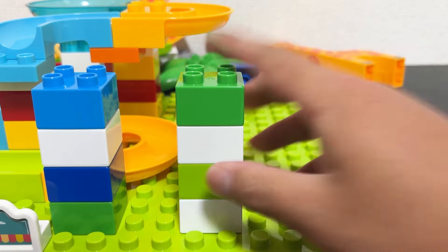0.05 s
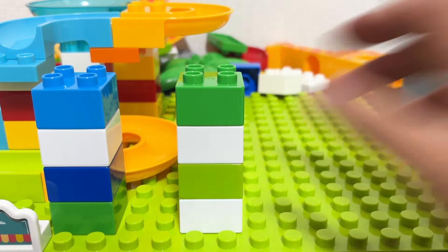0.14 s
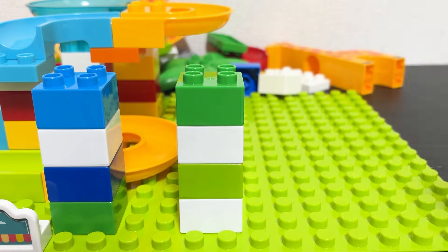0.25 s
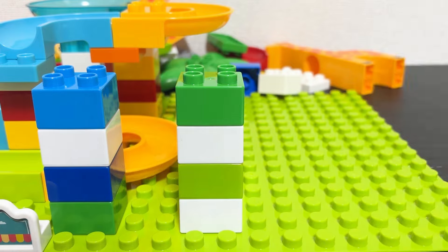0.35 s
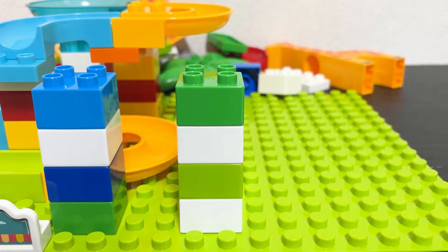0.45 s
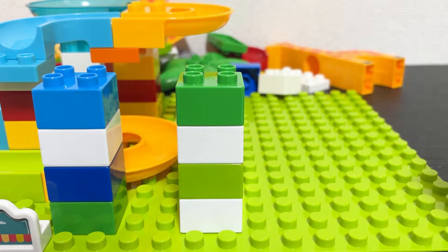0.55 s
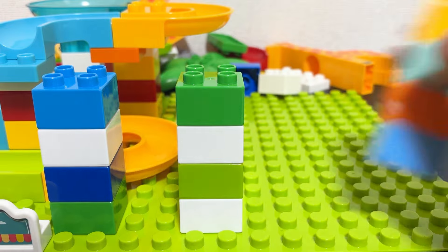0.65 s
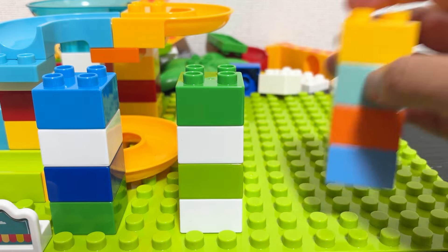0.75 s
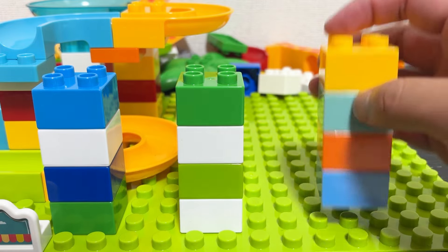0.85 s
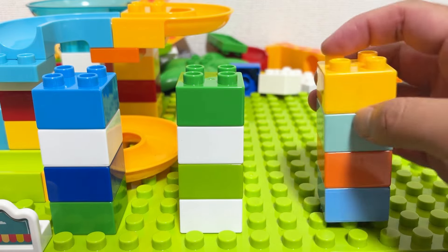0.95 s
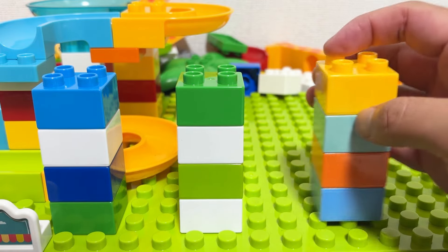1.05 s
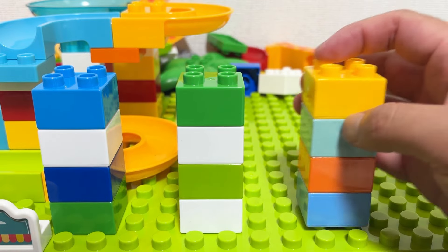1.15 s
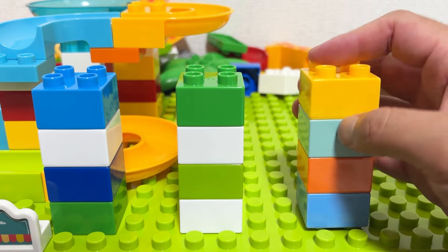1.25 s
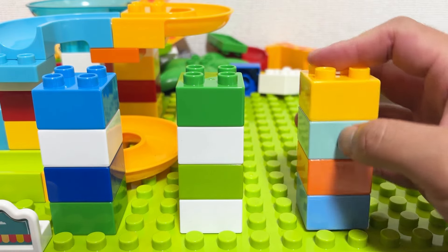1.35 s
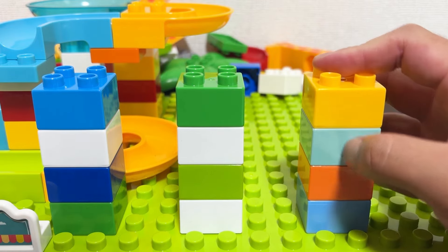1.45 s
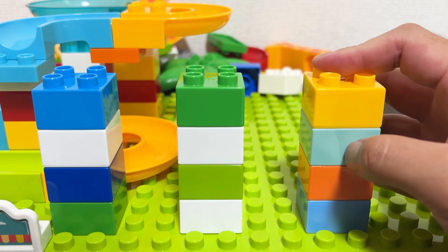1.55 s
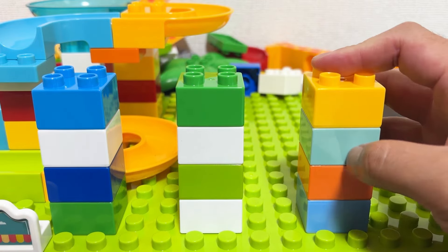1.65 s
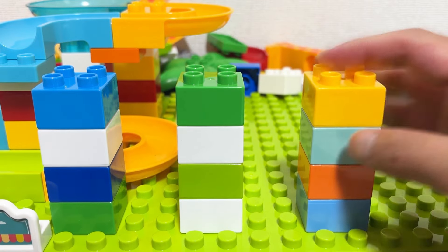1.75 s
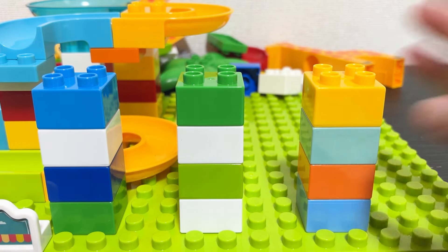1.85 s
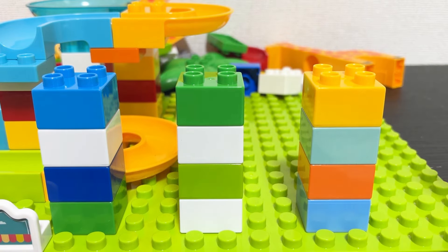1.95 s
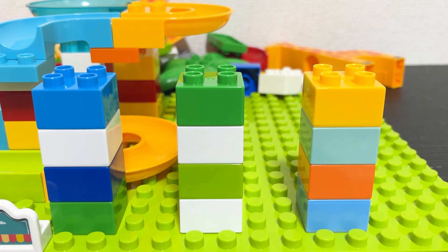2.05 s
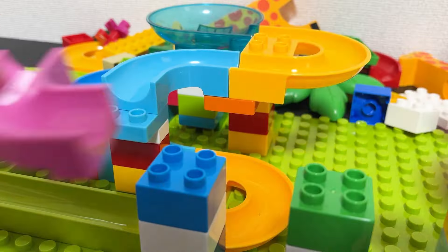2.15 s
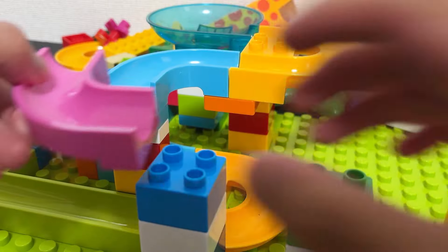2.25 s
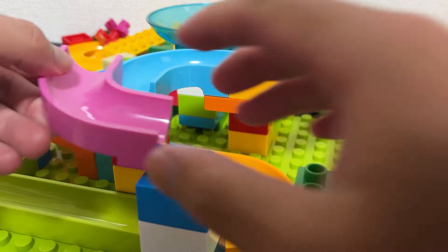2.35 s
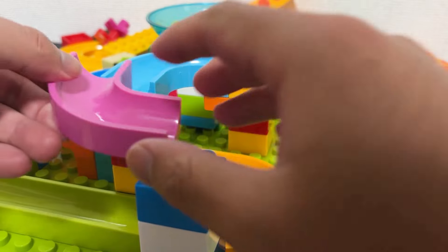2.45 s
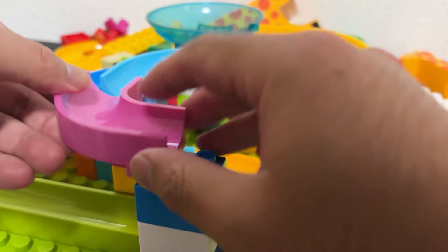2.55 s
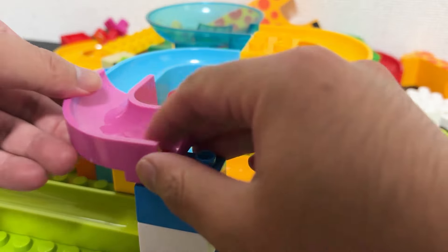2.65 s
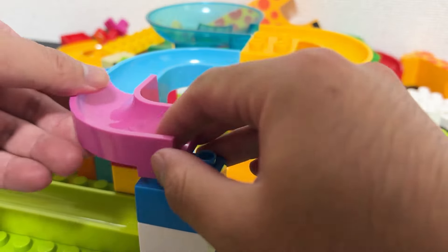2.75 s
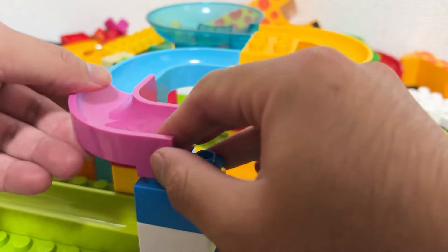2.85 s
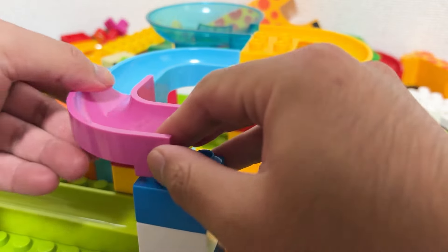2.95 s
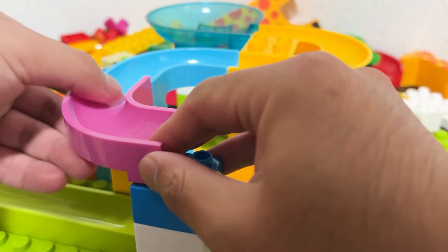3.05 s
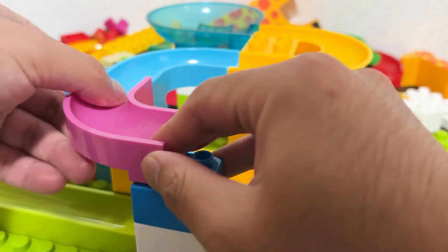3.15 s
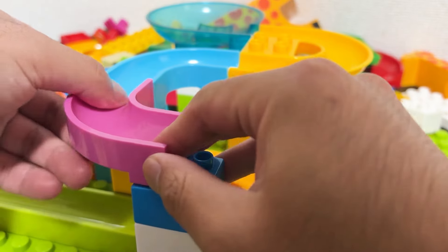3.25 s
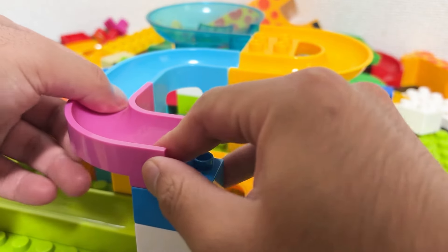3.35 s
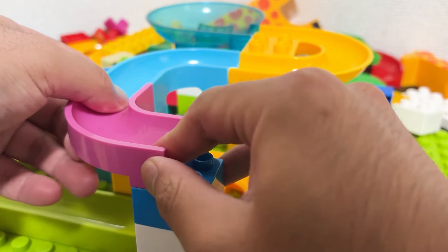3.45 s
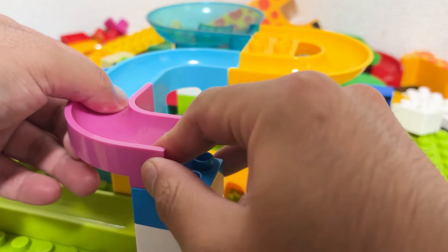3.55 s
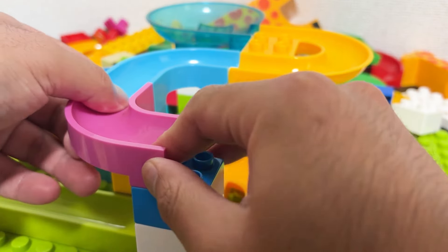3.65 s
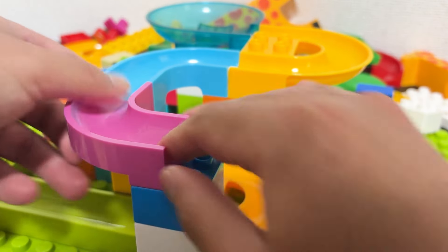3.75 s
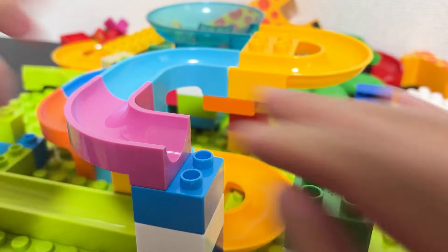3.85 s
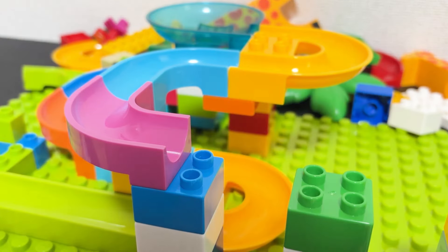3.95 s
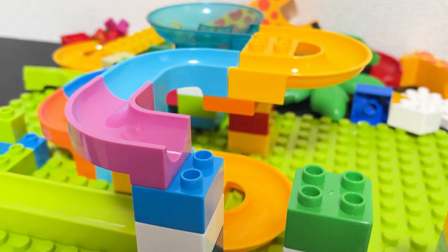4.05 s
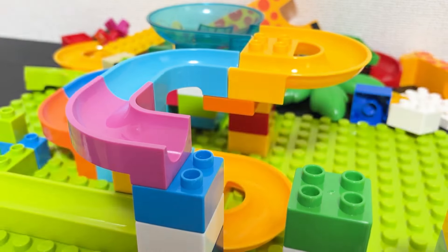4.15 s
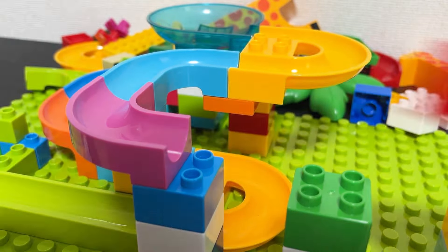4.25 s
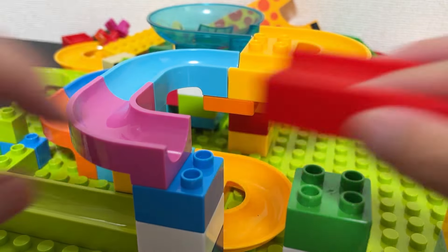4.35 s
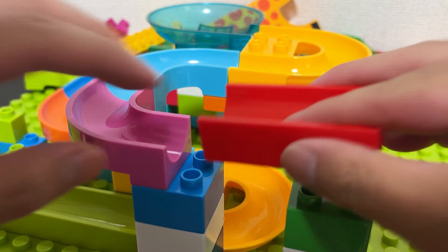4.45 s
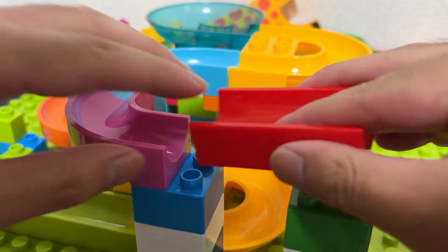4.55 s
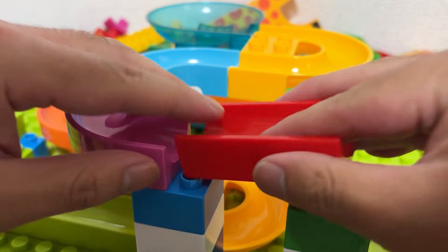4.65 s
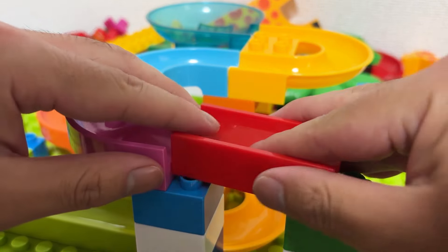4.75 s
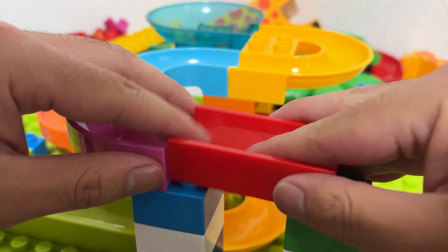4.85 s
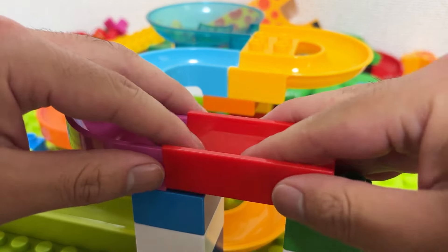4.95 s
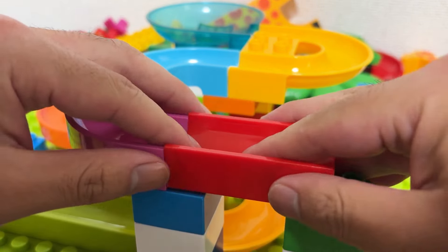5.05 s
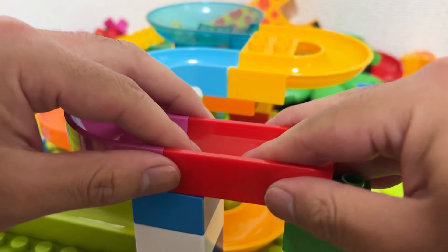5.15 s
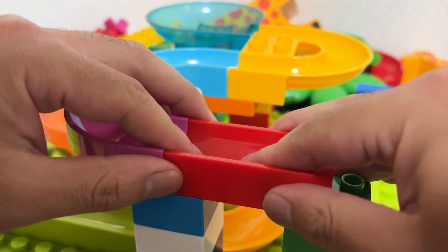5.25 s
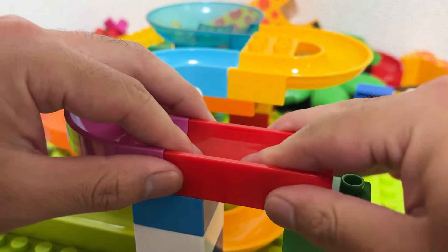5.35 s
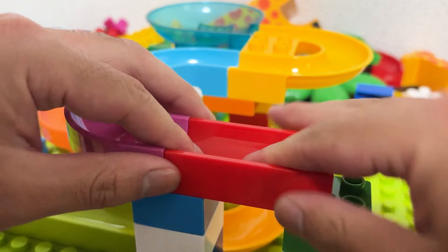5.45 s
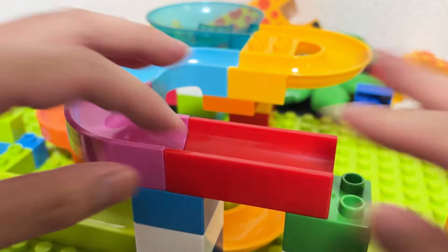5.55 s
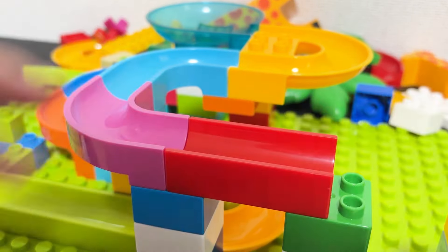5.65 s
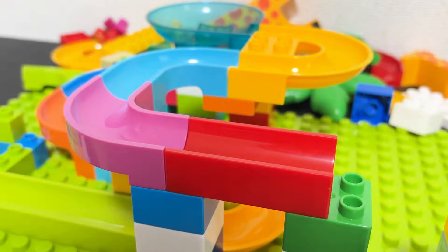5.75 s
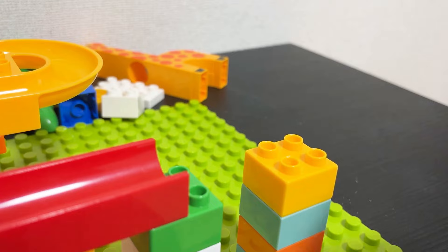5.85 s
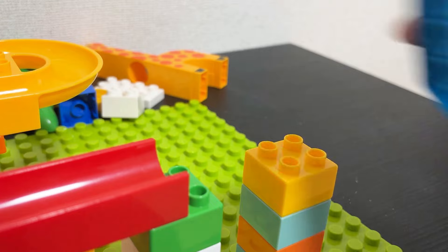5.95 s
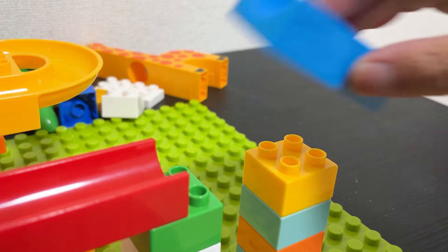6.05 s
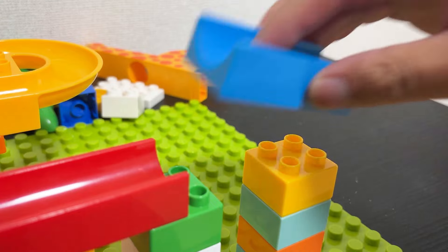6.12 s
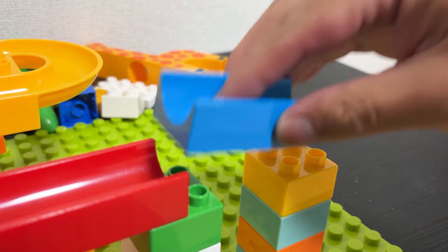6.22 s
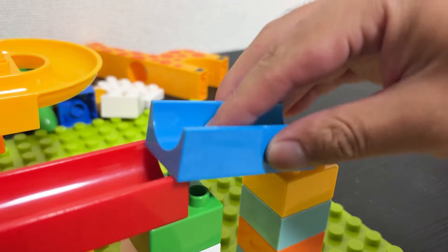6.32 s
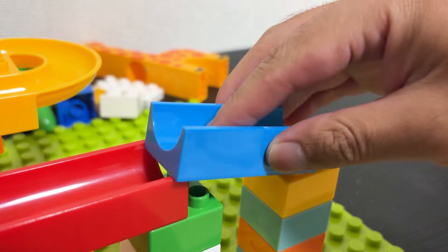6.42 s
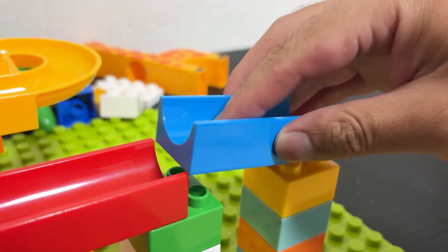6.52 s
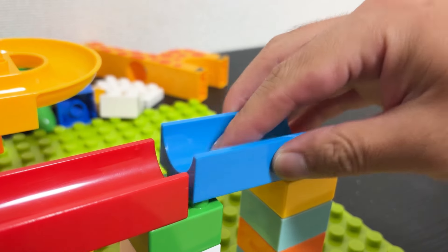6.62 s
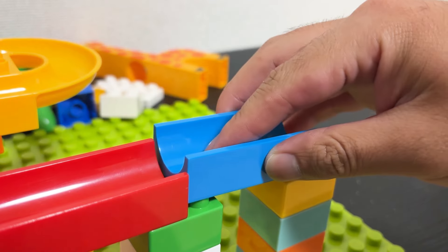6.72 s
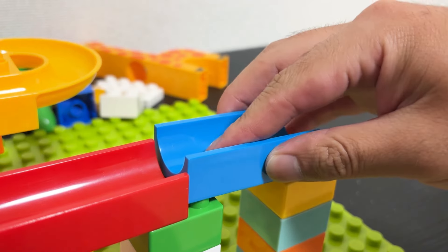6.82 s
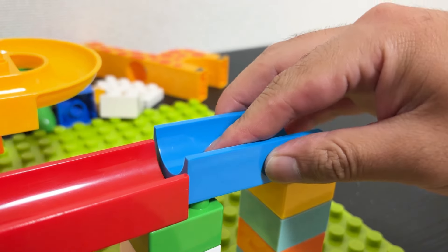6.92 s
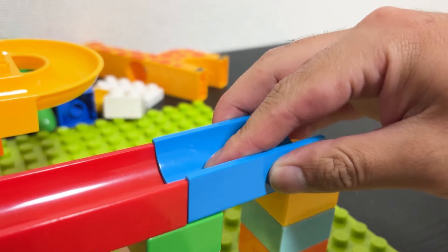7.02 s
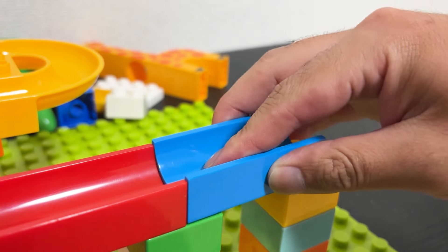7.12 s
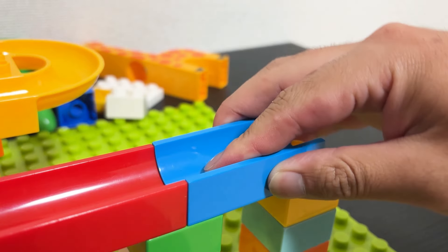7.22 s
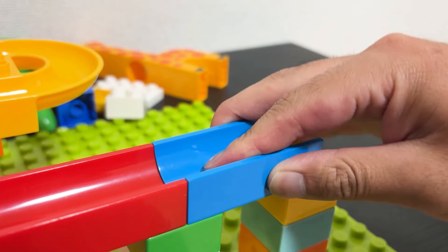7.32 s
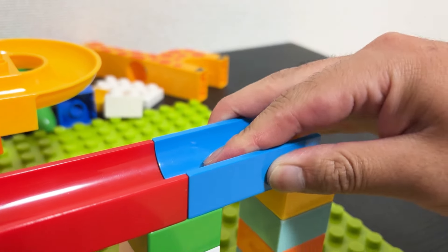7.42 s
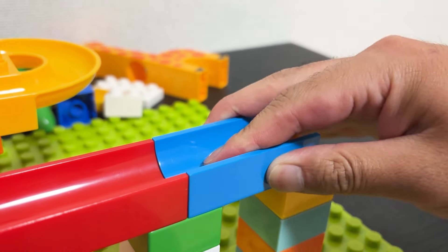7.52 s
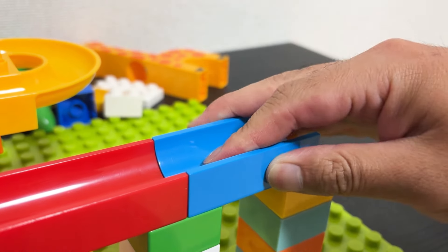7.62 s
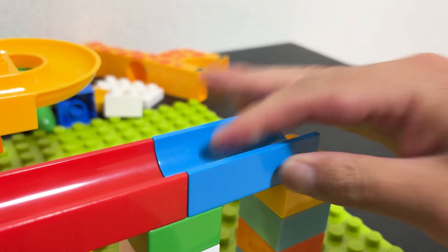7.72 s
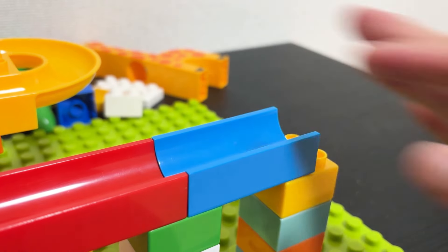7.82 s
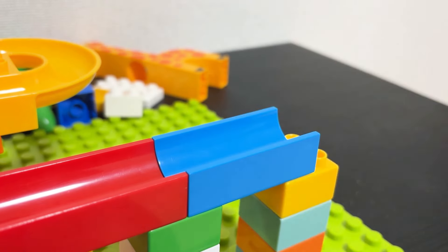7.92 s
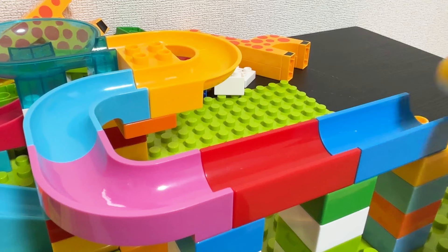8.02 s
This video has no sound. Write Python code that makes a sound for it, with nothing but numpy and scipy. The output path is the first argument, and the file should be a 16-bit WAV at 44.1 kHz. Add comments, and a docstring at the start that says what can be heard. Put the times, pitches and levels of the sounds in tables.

```python
"""Hollow plastic blocks and track pieces, fitted together by hand on a table, close to the microphone.
Each contact is a short flurry of ticks that rings the pieces and thumps the table top; in between,
fingers slide and pieces squeak in the grip. The place is a small quiet room that answers for about a
third of a second over a low household rumble. Heard in stereo through the two ports of a phone."""
import sys
import numpy as np
from scipy import signal
from scipy.fft import rfft, irfft
from scipy.io import wavfile
from scipy.ndimage import uniform_filter1d

SR = 44100
rng = np.random.default_rng(int(sys.argv[2]) if len(sys.argv) > 2 else 0)


def materialize(psi):
    """Save the field psi as 16-bit PCM at rate SR to the path in sys.argv[1].

    A 1-D psi becomes a single channel; in a 2-D psi each row is a channel.
    """
    bounded = np.clip(np.atleast_2d(psi).T, -1, 1)
    quanta = np.round(bounded * 32767).astype(np.int16)
    wavfile.write(sys.argv[1], SR, quanta)


N = 356328

# the level of the low background rumble wavers irregularly: time_s, relative_db
RUMBLE_WAVER = [(0, -67.5), (.25, -66.5), (.47, -74), (1.3, -70.5), (1.86, -68), (2.16, -80), (2.59, -76),
                (2.951, -66), (3.71, -73.5), (4.41, -73.5), (5.1, -65), (5.71, -72), (6.25, -65),
                (6.73, -63), (6.858, -80.5), (7.0, -64.5), (7.6, -70.5), (8.08, -76.5)]
# spectrum of the rumble: freq_hz, relative_db
RUMBLE_SPECTRUM = [(18, -28), (35, -3.5), (55, 3), (90, -8.5), (140, -24.5), (300, -59)]
# spectrum of the air hiss: freq_hz, relative_db
HISS_SPECTRUM = [(59, -29.5), (100, -3.5), (129, -2.5), (150, -10), (433, -18.5), (854, -25.5),
                 (1480, -32.5), (1760, -33), (2080, -33.5), (6560, -36.5), (16000, -51)]
# reverberation of the small room: freq_hz, t60_s, gain_db
ROOM_DECAY = [(60, 0.52, -6), (250, 0.45, -4.5), (1000, 0.28, -0.5), (3000, 0.2488, -3.5),
              (7000, 0.3, -13.5), (14040, 0.2, -14)]
# how alike the room sounds at the left and right ports: freq_hz, coherence
ROOM_COHERENCE = [(100, .9), (300, 0.84), (700, 0.052), (1500, 0.3), (3000, .5), (6000, 0.56), (9000, 1),
                  (15000, 0.59)]
# fingers sliding on plastic: start_s, loudest_s, end_s, level_db, dull_share_db
FINGER_SLIDES = [(0, 0.033, 0.0594, -65, -7), (0.528, 0.655, 0.793, -67.5, -18),
                 (.85, 0.853, 0.95, -76, -25), (1.02, 1.087, 1.128, -57.5, -8),
                 (1.2, 1.201, 1.41, -65.5, -10), (1.359, 1.468, 1.509, -68, -3),
                 (1.58, 1.612, 1.687, -70.5, -3), (1.738, 1.759, 1.805, -76, 5.5),
                 (2.165, 2.203, 2.346, -84, 1.5), (2.433, 2.476, 2.697, -76.5, 14),
                 (2.51, 2.643, 2.795, -65.5, 13), (2.795, 2.902, 3.205, -71, -5),
                 (3.027, 3.052, 3.21, -67.5, -9), (3.342, 3.38, 3.505, -69.5, -6),
                 (3.682, 3.767, 3.883, -64, -5), (3.861, 3.923, 4.164, -78.5, -7.5),
                 (4.231, 4.256, 4.36, -73, -17), (4.3, 4.582, 5.58, -75.5, -17.5),
                 (5.068, 5.156, 5.225, -69, 3), (5.431, 5.525, 5.57, -60, -12),
                 (5.862, 5.895, 5.994, -74.5, -14.5), (5.973, 6.02, 6.172, -66, -24),
                 (6.448, 6.457, 6.56, -68.5, -1.5), (7.19, 7.224, 7.313, -75, 19),
                 (7.26, 7.331, 7.4, -64, 13.5), (7.398, 7.461, 7.53, -69, 15.5),
                 (7.62, 7.704, 7.797, -68.5, -7)]
# bright bands of skin friction: centre_hz, width_hz, gain_db
SKIN_BANDS = [(2850, 1100, -2), (5600, 3100, -2.5), (8270, 7100, -0.5), (11960, 4300, -3)]
# low resonances of a rubbed piece: centre_hz, width_hz, gain_db
RUBBED_BANDS = [(654, 500, -0.5), (1157, 1000, -4.5), (2019, 150, -4)]
# a piece slips in the grip or onto the studs: start_s, loudest_s, end_s, level_db, pitch_hz
SLIP_SQUEAKS = [(0.532, .67, 0.715, -78.5, 2896), (0.857, 0.869, 0.897, -71.5, 2960),
                (1.037, 1.094, 1.112, -47, 3056)]
# modes of the table top: pitch_hz, gain_db, t60_s
TABLE_MODES = [(57, -17.5, 0.28), (74.11, -20, 0.65), (85.42, -13.5, 0.73), (126, -13, 0.09),
               (145.6, -16.5, 0.18), (201.66, -3.5, 0.1), (270.2, -12.5, 0.12), (380.4, -9.5, 0.066),
               (537.02, -4.5, 0.057)]
# the hand leans its weight on the table: start_s, push_db
HAND_PRESSES = [(0.942, -41.5), (1.144, -35), (1.315, -53.5), (3.002, -44), (4.747, -53), (5.006, -44),
                (5.093, -49), (5.183, -47.5), (6.293, -50), (6.53, -53), (6.698, -49.5), (6.972, -29.5),
                (7.065, -38.5), (7.23, -32), (7.304, -37.5), (7.364, -44)]
# modes of the hollow pieces: pitch_hz, gain_db, t60_ms
PLASTIC_MODES = [(722, 1, 5.3), (1211, 1, 12), (1453, -0.5, 15), (1924, -5.5, 5.9), (3010, -6.5, 6.6),
                 (3965, -4, 17), (4095, -5, 6.8), (4975, 1.5, 13), (6045, 2.5, 5.8), (6080, -3, 6.1),
                 (6670, -3, 8), (8960, -6.5, 3.6)]
# the piece in hand and its air space: from_s, hollow_hz, left_minus_right_db, tick_below_snap_db
HELD_PIECES = [(0, 2950, 1, 8), (1.125, 3805, 2, 3.5), (2.2, 2697, 3, 23), (2.5, 2142, 3, 8),
               (2.95, 2747, 3.5, 6.5), (4.4, 2923, 3, 9.5), (4.95, 2895, 2, 5.5), (6.1, 2717, 3.5, 10.5),
               (6.9, 3667, 1.48, 7), (7.2, 2626, 2.5, 5)]
# plastic meets plastic; body, hollow, snap and table knock are trims relative to the level:
# start_s, level_db, ring_hz, body_db, hollow_db, snap_db, knock_db, flurry_ms
CONTACTS = [(.246, -62.5, 4110, -36.5, -27.5, 0, -23.5, 4.3),
            (.548, -60.5, 5000, -31.5, -3, -1.5, -32, 4.4),
            (.943, -27, 608, -5.5, -16.5, -3.5, -16.5, 3.71),
            (1.085, -31, 1900, -13, -10, -18.5, -28.5, 8.9), (1.113, -27, 3240, -8, 2, -12.5, -14, 11),
            (1.118, -18.5, 2748, -19.5, -8.5, -15.5, -33, 8.7),
            (1.129, -18.5, 3900, -21.5, -13.5, -6.5, -36.5, 4.44),
            (1.144, -26, 3670, -33.5, -3.5, -18, -14, 3.3), (1.315, -48, 596, -13, -30.5, -26, -5, 2.7),
            (1.459, -57.5, 1000, -13, -25.5, -10, -4, 3.76),
            (1.601, -55, 659, -19.5, -15.5, -9.5, -10.5, 5.5),
            (1.757, -56.5, 1747, -25, -25, -11.5, -12, 4.5),
            (2.352, -19, 2726, -26.5, -24, -22, -32.5, 3.8), (2.447, -45, 1140, 1, -26.5, -42.5, -40, 5.3),
            (2.454, -37.5, 1119, -19, -20, -30.5, -17, 9.8), (2.477, -49.5, 1090, -12, 4, -23, -20.5, 2.8),
            (2.519, -30.5, 1977, -19.5, -4.5, -20.5, -38.5, 6.8),
            (2.558, -28.5, 2050, -13, -26, -14, -21.5, 8.4), (2.577, -36.5, 1004, -8, -15, -9, -18, 4.05),
            (2.589, -28, 2284, -18, -4, -11.5, -22.5, 1.6), (2.609, -38, 2800, -24, -10, -25.5, -12.5, 4.5),
            (2.645, -25, 3930, -27.5, -10.5, -31.5, -20.5, 6.95),
            (2.656, -38, 1100, -8, -20.5, -8, -18.5, 3.7), (2.668, -28, 736, -17, -31.5, -13.5, -14, 3.65),
            (2.701, -42.5, 670, -15, -6, -25, -9, 4), (2.746, -39, 918, -27.5, -26.5, -16, -9.5, 9.4),
            (2.837, -51, 926, -22.5, -27.5, -28.5, -19, 8),
            (2.894, -34.5, 4355, -14.5, -25, -23, -17.5, 5.59), (2.907, -45, 4300, -14, -16, -17, -22, 2.8),
            (2.965, -39, 762, -17, -6, -25.5, -14, 11.3), (2.989, -25.5, 853, -13, -8.5, -11, -11.5, 9.7),
            (3.001, -29.5, 1164, -6.5, -16, -30, -6, 2.68),
            (3.242, -23, 4520, -20, -28, -15.5, -21.5, 4.82), (3.263, -31, 5240, -18.5, -19, -7, -33, 1.77),
            (3.324, -23.5, 4940, -19.5, -19, -13, -19, 5.65),
            (3.684, -56.5, 930, -7.5, -19.5, -20, -3, 3.8), (3.711, -55, 789, -14.5, -10.5, -6.5, -9, 5.44),
            (3.738, -35.5, 7933, -25.5, -14, -9, -20, 4.46),
            (3.91, -63.5, 743, -17.5, -26.5, -5.5, -21, 4.8),
            (4.65, -28, 1190, -17.5, -23, -10, -41, 10.85), (4.694, -43, 1240, -7, -19.5, -10, -16, 6),
            (4.746, -2.5, 2951, -32, -43, -21.5, -36, 3.21),
            (4.867, -29, 1460, -27, -17.5, -15.5, -27.5, 16),
            (4.886, -24.5, 831, -13, -23.5, -10, -22.5, 3.7),
            (4.898, -22, 2627, -16, -33, -21.5, -22.5, 4.85),
            (5.005, -13.5, 2700, -18.5, -17, -13, -27.5, 3.72),
            (5.016, -21, 3010, -43, -27.5, -15.5, -15, 6.1),
            (5.094, -43, 997, -12.5, -16.5, -20.5, -14, 9.4),
            (5.183, -51, 690, 4.5, -25.5, -17.5, 6.5, 3.95),
            (5.201, -49, 1500, -3.5, -21, -19.5, -19.5, 3.18),
            (5.235, -28.5, 618, -8.5, -14.5, -11, -14, 4.22),
            (5.29, -44, 1180, -11, -26.5, -1.5, -14.5, 3.34),
            (5.404, -43, 687, -10.5, -13.5, -14, -14.5, 3.6), (5.43, -45.5, 5100, -17, -18, -7, -35, 2.9),
            (5.457, -47, 5160, -13.5, -4, -11, -11, 4.5), (5.581, -39, 1375, -11.5, -23, -22.5, -18, 5.24),
            (5.682, -54, 818, -11, -19.5, -31.5, -15.5, 7.27),
            (5.953, -48.5, 4700, -31, -23, -7.5, -12, 3.45),
            (6.291, -12.5, 3050, -25.5, -7.5, -11, -43, 3.52),
            (6.456, -45, 1176, -9, -19, -8.5, -15.5, 9.1), (6.505, -42, 1170, -18.5, -23.5, -13, -27, 7.5),
            (6.528, -51.5, 830, -30, -19.5, -10.5, -7.5, 11.1),
            (6.608, -27, 1300, -19, -22.5, -20.5, -13.5, 9.54),
            (6.635, -28.5, 3360, -4, -23, 5, -27.5, 5.96), (6.637, -15, 2564, -14, 2.7, -10.5, -31, 2.76),
            (6.699, -33, 1304, -42.5, -20.5, -15, -17.5, 9.3),
            (6.913, -57, 1143, -27.5, -4.5, -17, -30.5, 15),
            (6.937, -38, 5740, -10, -14.5, -0.5, -18, 4.35), (6.971, -18, 3423, -20.5, -5, 4, -49.5, 2.5),
            (6.974, -13, 3700, -16, -2, -12, -13.5, 4.49),
            (7.227, -10.5, 789.4, -10.5, -5, -13.5, -17.5, 3.57),
            (7.231, -16.5, 1065, -17, -30, -5.5, -23.5, 2.38),
            (7.357, -50, 1130, 3.5, -21, -6.5, -14.5, 4.7),
            (7.364, -39, 1875, -12.5, -16.5, -17, -17, 20.5), (7.393, -44.5, 860, 2, -25, -12.5, -3.5, 4.8),
            (7.411, -42.5, 1140, -23, -18.5, -11, -14, 6.3),
            (7.443, -48, 1000, -15.5, -4, -3.5, -16.5, 6.1), (7.454, -39.5, 1079, -6, -4, -4.5, -5.5, 4.5),
            (7.496, -50, 687, -18.5, -7, -7, -3, 3), (7.535, -49.5, 644, -13, -15, -8, -17.5, 4.5),
            (7.551, -44.5, 584, -15, -14, -11.5, -15, 4.05),
            (7.561, -49.5, 674, -19.5, -10.5, -14, -9, 4.6), (7.572, -48, 662, -13.5, -8, -10.5, -13, 6.2),
            (7.699, -55.5, 798.6, -12.5, -16, -7.5, -3.5, 8.37)]
# phase between the microphone ports: freq_hz, left_lead_rad
PORT_PHASE = [(200, 0), (700, .6), (1100, -.4), (3500, .7), (4900, .1), (5700, -.9), (6500, 0), (7600, -.1),
              (10000, -3.14), (12300, -6.2), (16000, -9.5)]
# balance of the ports: freq_hz, left_minus_right_db
PORT_BALANCE = [(300, 0), (1200, 2), (3500, -0.5)]
# treble roll-off of the microphone: freq_hz, gain_db
MIC_RESPONSE = [(14400, 0), (15300, -18), (16500, -20.5)]

RING_CYCLES, HOLLOW_T60_S = 25, 0.024  # time to fall 60 dB: a contact's main ring, the air space
GRIP_SCATTER_DB, PAN_SCATTER_DB = 3, 0.99  # from contact to contact
STROKE_RISE_DB, STROKE_FALL_DB = 8.5, 14.5  # a stroke starts and ends this far below its loudest
DEEP_BELOW_HZ, DEEP_CUT_DB = 130, 10  # a knock drives the table's deep modes less
HISS_LEVEL_DB, MIC_CUTOFF_HZ = -72, 16400


def undb(db):
    """Decibels to gain."""
    return 10 ** (np.asarray(db) / 20)


def on_hz(table, hz, column=1):
    """A table's column, interpolated over log frequency."""
    rows = np.array(table, float)
    return np.interp(np.log(np.maximum(hz, 1)), np.log(rows[:, 0]), rows[:, column])


def band(x, hz, width_hz):
    """Two-pole resonance, gain 1 at the centre."""
    return signal.lfilter(*signal.iirpeak(hz, hz / width_hz, fs=SR), x)


def ring(hz, t60_s, t, phase=0):
    """A struck mode: a sine that dies away."""
    return np.sin(2 * np.pi * hz * t + phase) * np.exp(-np.log(1000) * t / t60_s)


def wander(rate_hz):
    """Smooth random drift, rate_hz new values a second."""
    hold = int(SR / rate_hz)
    steps = np.repeat(rng.standard_normal(N // hold + 1), hold)
    return 0.88 * uniform_filter1d(uniform_filter1d(steps, hold), hold)[:N]


def diffuse_spectra(hz, size):
    """Left and right noise spectra, as alike as the room makes them at the microphone."""
    alike = np.clip(on_hz(ROOM_COHERENCE, hz), 0, 1)
    mid, side = rfft(rng.standard_normal((2, size)))
    return (mid * np.sqrt(1 + alike) + np.array([[1], [-1]]) * side * np.sqrt(1 - alike)) / np.sqrt(2)


def room_tone():
    """All around the microphone: low background rumble whose level wavers irregularly, and faint hiss."""
    hz = np.arange(N // 2 + 1) * SR / N
    waver = undb(np.interp(np.arange(N) / SR, *np.transpose(RUMBLE_WAVER)) + 4)
    rumble = irfft(diffuse_spectra(hz, N) * undb(on_hz(RUMBLE_SPECTRUM, hz)), N)
    hiss = irfft(diffuse_spectra(hz, N) * undb(on_hz(HISS_SPECTRUM, hz)), N)
    hiss *= undb(2.8 * wander(rate_hz=1.9))
    return waver * rumble / np.std(rumble) + undb(HISS_LEVEL_DB) * hiss / np.std(hiss)


def room_reverb(source):
    """The near walls answer with a diffuse tail, each octave dying away at its own rate."""
    size = SR // 2
    t, hz = np.arange(size) / SR, np.arange(size // 2 + 1) * SR / size
    noise, tail = diffuse_spectra(hz, size), 0
    for centre_hz in 45 * 2. ** np.arange(9):
        octave = np.clip(1 - np.abs(np.log2(np.maximum(hz, 1) / centre_hz)), 0, 1)
        t60_s, gain_db = on_hz(ROOM_DECAY, centre_hz), on_hz(ROOM_DECAY, centre_hz, column=2)
        fade = np.exp(-np.log(1000) * t / t60_s) * np.sqrt(2 * np.log(1000) / t60_s / SR)  # unit energy
        tail += undb(gain_db) * fade * irfft(noise * octave, size)
    tail *= np.clip((t - .003) / 0.0018, 0, 1)  # silent until the first wall answers
    return signal.fftconvolve(source[None], tail, axes=1)[:, :N]


def stroke(start_s, loudest_s, end_s, level_db):
    """Gain of one stroke of the hand: it swells, then fades."""
    t = np.arange(N) / SR
    gate = np.clip(np.minimum(t - start_s, end_s - t) / 0.0085, 0, 1)
    contour_db = [level_db - STROKE_RISE_DB, level_db, level_db - STROKE_FALL_DB]
    return gate * undb(np.interp(t, [start_s, loudest_s, end_s], contour_db))


def finger_slides():
    """Skin drags over plastic, close and a little left: gritty hiss in the pieces' resonances."""
    bright_gain, dull_gain = 0, 0
    for *times, level_db, dull_db in FINGER_SLIDES:
        gain = stroke(*times, level_db)
        bright_gain += gain * undb(1)
        dull_gain += gain * undb(dull_db)
    grit = rng.standard_normal(N) * undb(2 * wander(rate_hz=270) + 2 * wander(rate_hz=40))
    bright = sum(undb(db) * band(band(grit, hz, width), hz, width) for hz, width, db in SKIN_BANDS)
    dull = sum(undb(db) * band(grit, hz, width) for hz, width, db in RUBBED_BANDS)
    rubbing = bright_gain * bright / np.std(bright) + dull_gain * dull / np.std(dull)
    return rubbing * undb([[.8], [-.8]])


def squeaks():
    """A piece sticks and slips unevenly: a rough narrow tone and its octave."""
    t, out = np.arange(N) / SR, np.zeros(N)
    rough = [band(rng.standard_normal(N), hz=40, width_hz=140) for _ in range(4)]
    for *times, level_db, pitch_hz in SLIP_SQUEAKS:
        phase = 2 * np.pi * pitch_hz * t
        tone = rough[0] * np.sin(phase) + rough[1] * np.cos(phase)
        octave = rough[2] * np.sin(2 * phase) + rough[3] * np.cos(2 * phase)
        out += stroke(*times, level_db) * (tone + undb(-4) * octave) / np.std(tone)
    return out * undb([[.6], [-.6]])


def table_thumps(spot_scatter):
    """The table top rings under each contact; the hand's weight drives only its deep modes."""
    force = np.zeros((len(TABLE_MODES), N))
    pulse = np.hanning(64) * 0.09214
    deep = np.array(TABLE_MODES)[:, 0] < DEEP_BELOW_HZ
    for (start_s, level_db, *_, knock_db, _), scatter in zip(CONTACTS, spot_scatter):
        i = int((start_s + .0022) * SR)  # just after the click
        # each spot on the table drives the modes differently
        drive = undb(level_db + knock_db - deep * DEEP_CUT_DB + 2 * scatter)
        force[:, i:i + len(pulse)] += drive[:, None] * pulse
    for start_s, push_db in HAND_PRESSES:
        i = int((start_s + .0022) * SR)
        force[deep, i:i + len(pulse)] += undb(push_db) * pulse
    t, thumps = np.arange(SR) / SR, 0
    for k, (blows, (hz, db, t60_s)) in enumerate(zip(force, TABLE_MODES)):
        # the higher modes reach the two ports out of step
        phase = (-1) ** k * min(hz / 1100, .45) * np.array([[1], [-1]])
        mode = undb(db) * ring(hz, t60_s, t, phase) * (1 - np.exp(-t / 0.0038))
        thumps += signal.fftconvolve(blows[None], mode, axes=1)[:, :N]
    return signal.sosfilt(signal.butter(3, 45, "high", fs=SR, output="sos"), thumps)


def stud_click(ring_hz, hollow_hz, body_db, hollow_db, snap_db, tick_db, flurry_ms, chance):
    """Studs catch in a flurry of ticks that rings the pieces: sound to the microphone and to the room."""
    size = len(chance)
    t, hz = np.arange(size) / SR, np.maximum(np.arange(size // 2 + 1) * SR / size, 1)
    grit = chance[:, 0] * undb(5.624 * chance[:, 1])
    envelope = np.exp(-(1000 * t / flurry_ms) ** 1.4) * np.minimum(t / 0.00097, 1)
    flurry = rfft(grit * envelope)
    # the grip shifts each mode's strength and pitch a little
    modes = sum(undb(db + GRIP_SCATTER_DB * grip) * ring(mode_hz * (1 + 0.07 * shift), t60_ms / 1000, t)
                for (mode_hz, db, t60_ms), (grip, shift) in zip(PLASTIC_MODES, chance[:, 2:]))
    # a toneless crack fills the gaps between the modes; over all directions the modes mostly even out
    facing = rfft(modes) + undb(26.5)
    all_round = undb(-13) * rfft(modes) + undb(23)
    bass_cut = 1 / (1 + (360 / hz) ** 4)  # small pieces radiate no bass
    main_ring = rfft(ring(ring_hz, RING_CYCLES / ring_hz, t)) * bass_cut
    hollow = rfft(ring(hollow_hz, HOLLOW_T60_S, t)) * bass_cut
    parts = [(main_ring, main_ring, -6, -6), (hollow, hollow, hollow_db - 5.5, 4)]
    lag = np.exp(-2j * np.pi * hz * .001)  # leaves time for the crack to rise
    for low_hz, high_hz, peak_db in [(340, 2000, body_db + 6.5),
                                     (2000, 3700, (body_db + snap_db) / 2 + 7),
                                     (4800, 9400, snap_db + 5), (10000, 18000, tick_db + 9.5)]:
        passband = lag / (1 + (low_hz / hz) ** 8) / (1 + (hz / high_hz) ** 8)
        parts.append((passband * facing, passband * all_round, peak_db, 0))
    to_mic, to_room = 0, 0
    for mic_spectrum, room_spectrum, peak_db, send_db in parts:
        direct, spread = irfft(flurry * mic_spectrum), irfft(flurry * room_spectrum)
        direct *= undb(peak_db) / np.max(np.abs(direct))
        to_mic += direct
        to_room += spread * undb(send_db) * np.std(direct) / np.std(spread)
    return to_mic, to_room


def blocks():
    """Pieces click together and knock the table: close stereo sound, and a mono feed to the room."""
    size = 4096
    to_mic, to_room = np.zeros((2, N + size)), np.zeros(N + size)
    chance = rng.standard_normal((len(CONTACTS), size, 5))
    fade_out = np.clip(np.arange(size, 0, -1) / 512, 0, 1) ** 2
    for contact, draws in zip(CONTACTS, chance):
        start_s, level_db, ring_hz, body_db, hollow_db, snap_db, _, flurry_ms = contact
        _, hollow_hz, pan_db, tick_below_db = [row for row in HELD_PIECES if row[0] <= start_s][-1]
        pan_db += PAN_SCATTER_DB * draws[-1, 4]
        direct, spread = stud_click(ring_hz, hollow_hz, body_db, hollow_db, snap_db,
                                    snap_db - tick_below_db, flurry_ms, draws[:, :4])
        i = int((start_s - .0012) * SR)
        to_mic[:, i:i + size] += undb(level_db + np.array([[pan_db], [-pan_db]]) / 2) * direct * fade_out
        to_room[i:i + size] += undb(level_db) * spread * fade_out
    thumps = table_thumps(spot_scatter=chance[:, :len(TABLE_MODES), 4])
    return to_mic[:, :N] + undb([[.7], [-.7]]) * thumps, to_room[:N] + thumps[0]


def scene():
    """Blocks and hands up close; the walls and the room tone behind them."""
    close_blocks, to_room = blocks()
    friction = finger_slides() + squeaks()
    return close_blocks + friction + room_reverb(to_room + friction.mean(axis=0)) + room_tone()


def record(dry):
    """The phone's two microphone ports differ in phase and level; the top falls away and is cut."""
    hz = np.arange(N // 2 + 1) * SR / N
    right_lag = np.exp(-1j * np.array([0 * hz, on_hz(PORT_PHASE, hz)]))
    gain_db = on_hz(MIC_RESPONSE, hz) + on_hz(PORT_BALANCE, hz) * np.array([[.5], [-.5]])
    ports = irfft(rfft(dry) * right_lag * undb(gain_db), N)
    return signal.sosfilt(signal.ellip(10, .2, 80, MIC_CUTOFF_HZ, fs=SR, output="sos"), ports)


dry = scene()
out = record(dry)
materialize(out)
```